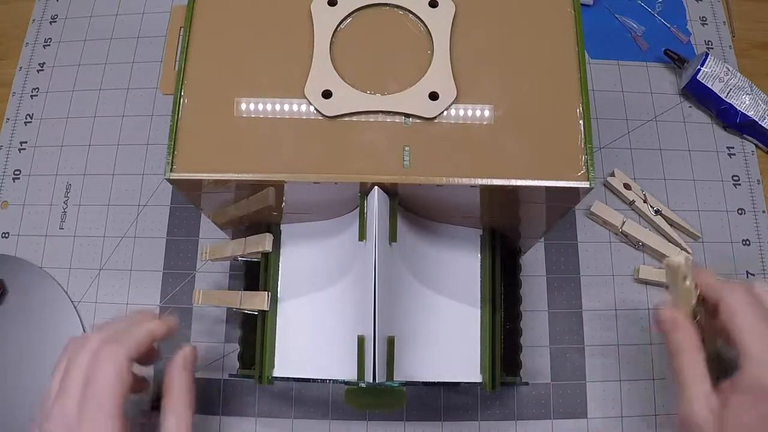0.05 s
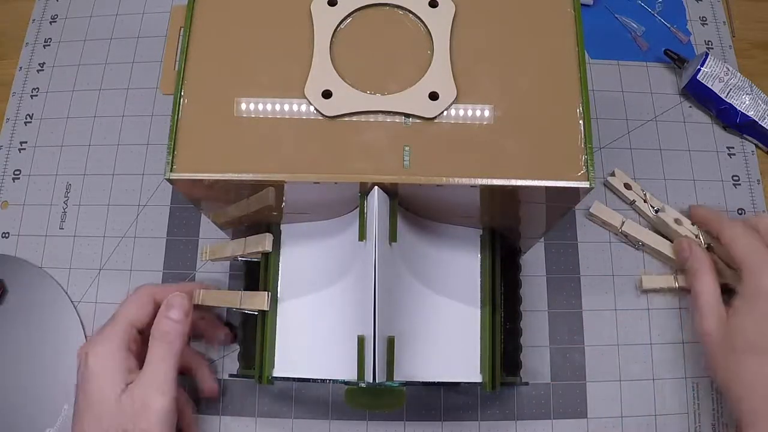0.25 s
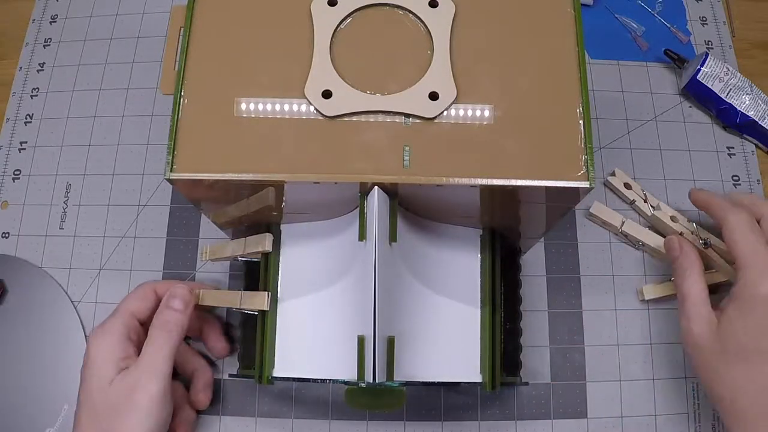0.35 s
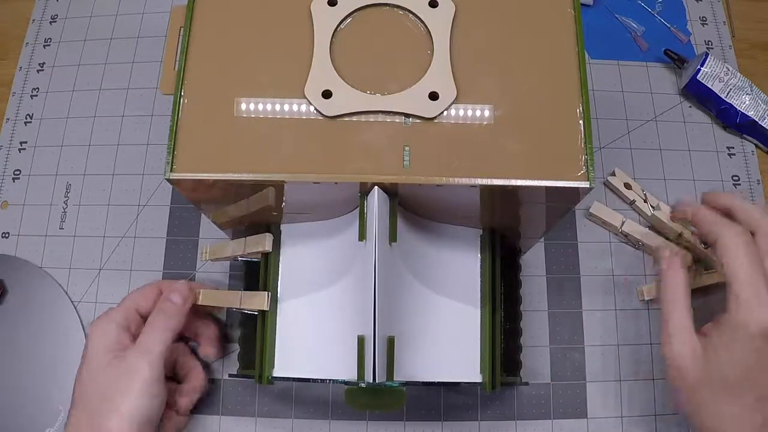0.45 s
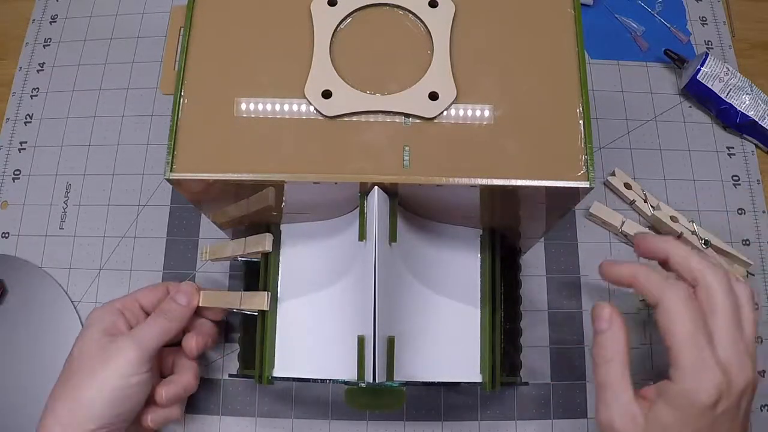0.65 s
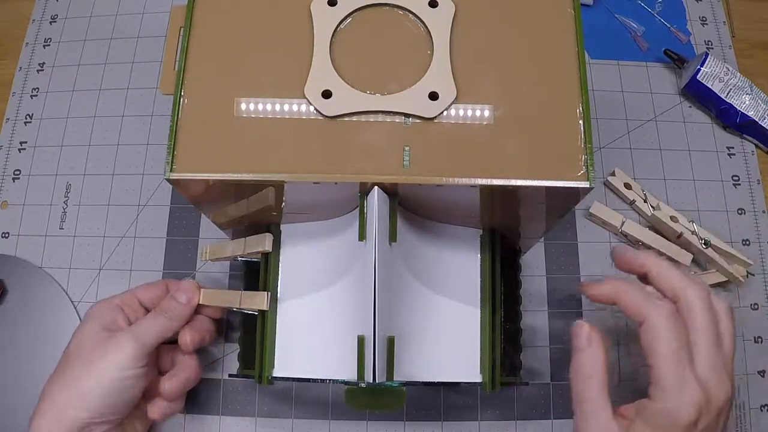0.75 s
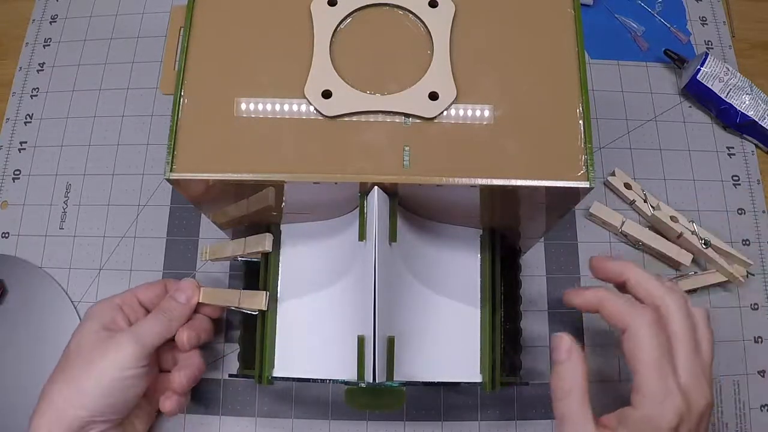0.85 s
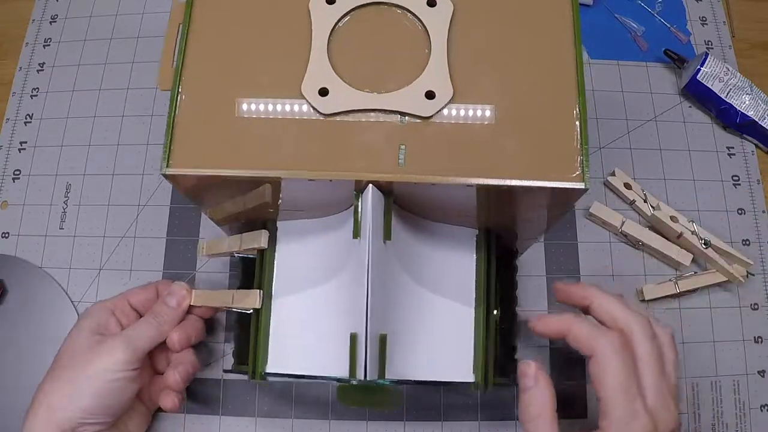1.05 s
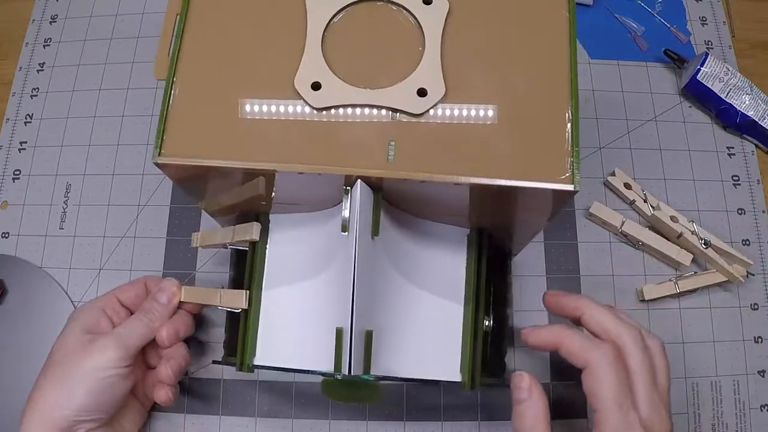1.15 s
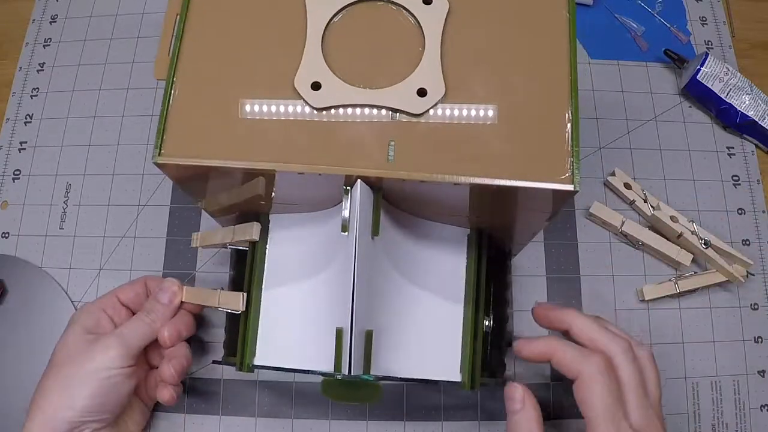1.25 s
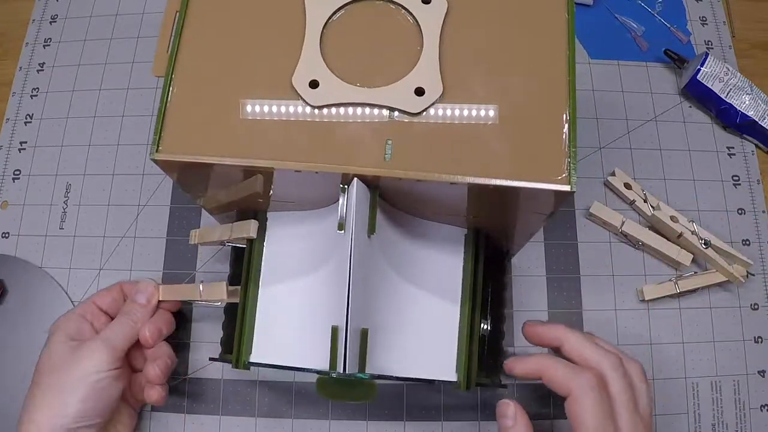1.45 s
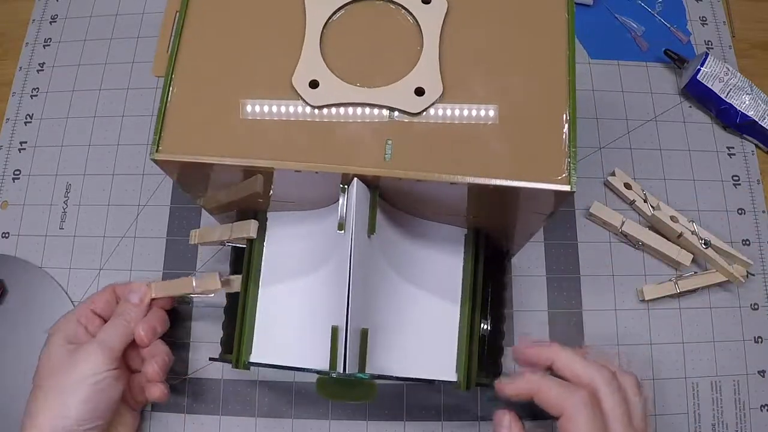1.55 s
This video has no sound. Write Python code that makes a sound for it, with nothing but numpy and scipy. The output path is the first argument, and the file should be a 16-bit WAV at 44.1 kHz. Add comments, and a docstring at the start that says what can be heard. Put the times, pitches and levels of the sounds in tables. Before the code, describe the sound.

Wooden clothespins handled up close: one bright hard clack early on, near quiet, then light ticks, a soft low table boom and small rubbing knocks, with short room reverberation over soft steady room noise.

```python
"""Clothespins on a hollow table

Wooden clothespins are handled in a small quiet room: one drops on a pile with a sharp clack,
another is squeezed, slid off a card model and let go. Runs of random knocks excite the pins' modes
and a dry crack; short force pulses set the hollow table top booming. Decaying noise bands give
the room tail, over a low hum that comes and goes and a wide, soft, steady room noise."""
import sys
import numpy as np
from scipy import signal
from scipy.fft import rfft, irfft
from scipy.io import wavfile

SR = 44100
rng = np.random.default_rng(int(sys.argv[2]) if len(sys.argv) > 2 else 0)


def dump(signal):
    """Clip the signal to [-1, 1] and save it as 16-bit WAV at the path in sys.argv[1]."""
    limited = np.clip(np.atleast_2d(signal).T, -1, 1)
    pcm = np.round(limited * 32767).astype(np.int16)
    wavfile.write(sys.argv[1], SR, pcm)


N = 70560  # samples, 1.6 s


def from_db(db):
    """Level law: decibels to amplitude gain."""
    return 10 ** (np.asarray(db) / 20)


def rms_one(x):
    """Normalisation: scale to unit rms."""
    return x / np.sqrt(np.mean(x ** 2) + 1e-20)


def at_hz(points, hz):
    """Spectral interpolation: read a table on a log-frequency axis."""
    table_hz, values = np.array(points).T
    return np.interp(np.log(hz + 1e-3), np.log(table_hz), values)


def band_pass(x, low_hz, high_hz):
    """Band limiting: pass what lies between two frequencies."""
    sos = signal.butter(2, [low_hz, high_hz], "band", fs=SR, output="sos")
    return signal.sosfilt(sos, x)


def ring(drive, hz, t60, lead):
    """Resonance: a drive excites a decaying sine, its phase leading on the left."""
    pole = from_db(-60 / (t60 * SR)) * np.exp(2j * np.pi * hz / SR)
    tone = signal.lfilter([1], [1, -pole], drive + 1e-18)
    side_phase = lead * np.array([[.5], [-.5]])
    return np.imag(tone * np.exp(1j * side_phase))


def window(start, length):
    """Event timing: progress 0-1 through an event, and where it is active."""
    progress = (np.arange(N) / SR - start) / max(length, 1e-3)
    return progress, (progress >= 0) & (progress < 1)


# Pin contacts. Each row: start in seconds, length in seconds, share of the length spent rising,
# level of the dry crack against the modes in dB, then levels of the low, low-middle, middle
# and high modes in dB.
PIN_CONTACTS = [(0.182, 0.015, 0.11, 14, -49.5, -41, -50.5, -47.5),
                (0.24, 0.0079, .1, 13, -35.5, -31.5, -23, -18.5),
                (0.247, 0.039, .05, 26, -41.5, -33, -34, -40.5),
                (0.281, .012, 0.16, 18, -51.5, -45.5, -70, -59),
                (0.774, 0.042, 0.34, 12, -55, -50.5, -55, -54),
                (0.866, 0.02, 0.55, 8, -46, -52, -59, -53.5), (1.01, .016, 0.2, 15, -53, -42.5, -46, -41),
                (1.024, 0.053, 0.59, 18, -44, -50, -57, -52.5),
                (1.074, 0.023, 0.34, 9.5, -38, -35, -44.5, -49.5),
                (1.234, 0.034, 0.47, 5, -35.5, -36, -53, -43.5),
                (1.307, 0.028, 0.089, 6, -38.5, -45, -50, -54),
                (1.3369, 0.017, 0.087, 12, -37, -40, -39.5, -44)]
# Modes of a wooden pin. Each row: frequency in Hz, level in dB, t60 in seconds, left lead in radians.
PIN_MODES = [(875, 6, 0.014, 0.98), (1231, 2.5, .04, 0.75), (1530, 3, 0.012, 1.24),
             (1987, 1.5, 0.019, 0.92), (2190, 4.5, 0.01, 0.48), (2835, -1.5, .012, 0.11),
             (3335, 2.5, 0.0089, 0.093), (3906, 1.5, 0.0068, 0.23), (4340, -3, 0.012, .4),
             (5000, -2.5, 0.0037, 0.45), (5480, 3, 0.0045, 0.79), (6070, 7, 0.0056, 1.5),
             (6940, 3, 0.0058, 0.27), (7550, 10, 0.004, 1.4), (8670, -5.5, 0.01, 2),
             (12100, -31, 0.0044, 2.6)]
# Edges of the four mode groups and crack bands, in Hz.
GROUP_EDGES_HZ = [600, 1400, 2500, 5200, 11000]
KNOCKS_PER_S, KNOCK_SPREAD_DB = 6000, 2
FADE_DB = 3  # dB per contact length, from the end of the rise


def contact_shape(start, length, rise):
    """Contact envelope: knock strength rises, falls a little, then tapers out."""
    progress, active = window(start, length)
    progress = np.clip(progress, 0, 1)
    attack = np.minimum(progress / max(rise, .02), 1)
    fade = from_db(-FADE_DB * np.clip(progress - rise, 0, 1))
    return active * attack * fade * (1 - progress ** 3)


def pins():
    """Modal excitation: runs of impulses ring the pin's modes and make a broadband crack."""
    ringing, cracking = np.zeros((2, 4, N))
    for start, length, rise, crack_db, *levels_db in PIN_CONTACTS:
        shape = contact_shape(start, length, rise)
        # equal expected knock energy whatever the length
        unit_shape = shape / np.sqrt(np.sum(shape ** 2) * KNOCKS_PER_S / SR)
        gains = from_db(levels_db)[:, None] * unit_shape
        ringing += gains
        cracking += from_db(crack_db) * gains
    struck = rng.random(N) < KNOCKS_PER_S / SR

    def knocks():
        """Uneven striking: fresh sizes and signs at the shared knock times."""
        sizes = from_db(KNOCK_SPREAD_DB * rng.standard_normal(N))
        return struck * sizes * rng.choice([-1, 1], N)

    out = np.zeros((2, N))
    groups = np.searchsorted(GROUP_EDGES_HZ[1:-1], np.array(PIN_MODES)[:, 0])
    for group, (hz, db, t60, lead) in zip(groups, PIN_MODES):
        out += from_db(db) * ring(ringing[group] * knocks(), hz, t60, lead)
    for gain, low, high in zip(cracking, GROUP_EDGES_HZ, GROUP_EDGES_HZ[1:]):
        crack = gain * np.array([knocks(), knocks()])  # independent left and right
        out += band_pass(crack + 1e-18, low, high)
    return out


# Pushes on the table top. Each row: start in seconds, swell in seconds, level of the main boom in dB,
# its pitch in Hz, its t60 in seconds, level of the drive to the other panel modes in dB.
TABLE_PUSHES = [(0.185, .004, -42.5, 345, 0.17, -46), (0.243, 0.0021, -16, 337.5, 0.034, -31.5),
                (0.258, 0.0091, -31, 361.3, 0.11, -41.5), (0.283, 0.0044, -36, 345.8, 0.17, -43.5),
                (0.374, 0.012, -40.5, 314.5, 0.18, -54.5), (0.491, 0.0063, -40, 330, 0.12, -53),
                (0.802, 0.0068, -42, 333, 0.13, -61), (0.867, 0.011, -43, 353, 0.14, -49.5),
                (1.012, 0.0044, -28.5, 337, 0.052, -44.5), (1.026, 0.024, -28.5, 335, 0.073, -38.5),
                (1.053, 0.044, -15.5, 308.3, 0.082, -37.5), (1.151, 0.022, -62, 295, 0.065, -52.5),
                (1.244, 0.014, -44, 448, 0.09, -50), (1.285, 0.038, -42, 233.6, .15, -51.5),
                (1.340, 0.0089, -33, 326, 0.1, -41)]
# Other panel modes. Each row: frequency in Hz, level in dB, t60 in seconds, left lead in radians.
PANEL_MODES = [(154, -11, .3, 1.15), (207, -15, 0.16, 0.65), (245.5, -1.7, 0.44, 1.8), (290, -30, 0.13, .8),
               (384, 7.5, 0.05, 0.37), (471, 2.5, 0.048, 1.67), (622, -1, 0.044, 1.55),
               (710, -29, 0.033, 1.6)]
BOOM_LEAD_RAD, BOOM_PAN_DB = 0.2, -0.5  # pan is left minus right
PUSH_SKEW = 0.47  # exponent; below 1 the force peaks early


def table():
    """Forced vibration: a push drives the main boom in step and the other modes with noise."""
    boom, shake = np.zeros((2, N)), np.zeros(N)
    rough = rng.standard_normal(N)
    for start, swell, boom_db, hz, t60, panel_db in TABLE_PUSHES:
        progress, active = window(start, swell)
        force = active * np.sin(np.pi * np.clip(progress, 0, 1) ** PUSH_SKEW)
        in_step = np.cos(2 * np.pi * hz * progress * swell)
        drive = 2 * force * in_step / force.sum()
        boom += from_db(boom_db) * ring(drive, hz, t60, BOOM_LEAD_RAD)
        shake += from_db(panel_db) * force * rough / np.sqrt(np.sum(force ** 2))
    out = boom * from_db([[BOOM_PAN_DB / 2], [-BOOM_PAN_DB / 2]])
    for hz, db, t60, lead in PANEL_MODES:
        out += from_db(db) * ring(shake, hz, t60, lead)
    return out


# Room tail. Each row: octave-band centre in Hz, level against the direct sound in dB, t60 in seconds.
ROOM_BANDS = [(192, 4.5, 0.38), (391, 2.5, 0.26), (775, 5, 0.19), (1496, 1.5, .25), (3200, 1, .22),
              (6780, -0.5, .22), (10300, -6, 0.18)]
ROOM_GAP_S, ROOM_LIKENESS = .003, 0.12  # delay of the tail; share of its power common to both sides


def room(x):
    """Diffuse reverberation: octave bands of noise, each dying at its own rate."""
    t = np.arange(SR // 2) / SR
    shared, left, right = rng.standard_normal((3, len(t)))
    noise = np.sqrt(ROOM_LIKENESS) * shared + np.sqrt(1 - ROOM_LIKENESS) * np.array([left, right])
    tail = np.zeros((2, len(t)))
    for hz, db, t60 in ROOM_BANDS:
        band = band_pass(noise, hz / np.sqrt(2), hz * np.sqrt(2))
        decay = (t > ROOM_GAP_S) * from_db(-60 * t / t60)
        tail += from_db(db) * band * decay / np.sqrt(np.sum(decay ** 2))
    mono = x.mean(axis=0)[None]
    return signal.fftconvolve(mono, tail, axes=1)[:, :N]


# Level curve of the low hum. Each row: time in seconds, level in dB.
HUM_LEVEL = [(0.0, -83), (0.052, -96), (0.258, -70), (0.276, -84), (0.404, -76), (0.53, -100), (0.574, -77),
             (0.9, -94), (1.108, -69), (1.336, -74.5), (1.448, -67), (1.6, -78)]
HUM_HZ, HUM_WIDTH_HZ, HUM_PAN_DB = 53, 7.4, -5  # pan is left minus right


def low_hum():
    """Narrow-band noise: a resonance driven by noise follows a level curve."""
    times, levels_db = np.transpose(HUM_LEVEL)
    t60 = np.log(1000) / (np.pi * HUM_WIDTH_HZ)  # decay time that gives this bandwidth
    tone = ring(rng.standard_normal(N), HUM_HZ, t60, 1.0)
    level_db = np.interp(np.arange(N) / SR, times, levels_db)
    return rms_one(tone) * from_db(level_db + [[HUM_PAN_DB / 2], [-HUM_PAN_DB / 2]])


# Spectrum of the noise shared by both sides. Each row: frequency in Hz, relative level in dB per Hz.
AIR_MID = [(25, -36), (54, -35), (109, -28.5), (150, 1), (200, -4.5), (340, -6.5), (530, -11.5),
           (860, -15.5), (1500, -17.5), (3000, -23), (4800, -26), (6000, -23), (9500, -25.5),
           (12500, -33.5), (14200, -41.5), (15100, -55)]
# Spectrum of the noise opposed between sides. Each row: frequency in Hz, relative level in dB per Hz.
AIR_SIDE = [(25, -26), (53, -28), (112, -42), (151, 2.5), (385, -2), (840, -2), (1400, -9), (2400, -18),
            (3500, -26), (4800, -28.5), (6000, -19.5), (9500, -27), (12500, -31), (14200, -41),
            (15100, -50)]
# Stereo lean of the noise. Each row: frequency in Hz, left minus right in dB.
AIR_PAN = [(60, 19), (110, -4.5), (200, -9), (380, -2), (690, -0.5), (1270, 0.0), (2350, 0.0), (4330, -1),
           (7970, -5), (14700, -1)]
AIR_MID_DB, AIR_SIDE_DB = -54, -48.5  # rms levels before the lean


def room_noise():
    """Spectral shaping: steady shared and opposed noise, with a lean set by frequency."""
    hz = np.arange(N // 2 + 1) * SR / N

    def shaped_noise(shape, level_db):
        """Filtered noise: weight a white spectrum, then set its rms level."""
        spectrum = rfft(rng.standard_normal(N)) * from_db(at_hz(shape, hz)) * (hz > 20)
        return from_db(level_db) * rms_one(irfft(spectrum, N))

    mid = shaped_noise(AIR_MID, AIR_MID_DB)
    side = shaped_noise(AIR_SIDE, AIR_SIDE_DB)
    lean_db = at_hz(AIR_PAN, hz) / 2
    return irfft(rfft(np.array([mid + side, mid - side])) * from_db([lean_db, -lean_db]), N)


LOW_CUT_HZ = 157  # the close sounds are thinned out below this


def scene():
    """Superposition: pins and table with their room tail, over hum and room noise."""
    low_cut = signal.butter(4, LOW_CUT_HZ, "high", fs=SR, output="sos")
    near = signal.sosfilt(low_cut, pins() + table())
    return near + room(near) + low_hum() + room_noise()


CUTOFF_HZ = 15400  # stopband edge, 60 dB down


def record(dry):
    """Low-pass filtering: the top is cut steeply."""
    return signal.sosfilt(signal.cheby2(16, 60, CUTOFF_HZ, fs=SR, output="sos"), dry)


dry = scene()
out = record(dry)
dump(out)
```